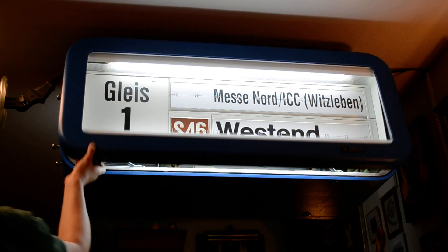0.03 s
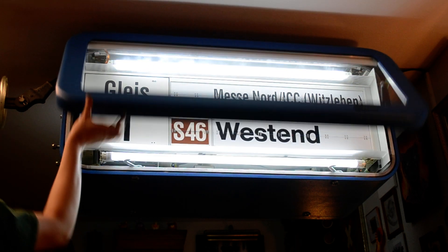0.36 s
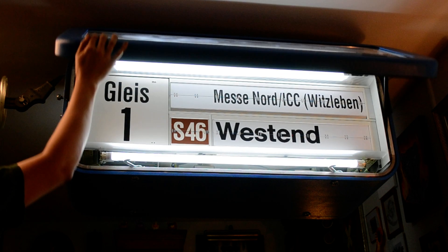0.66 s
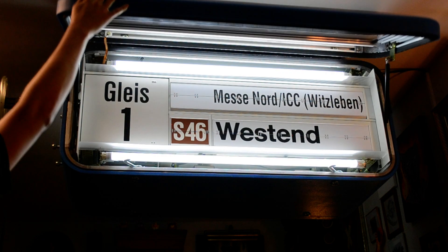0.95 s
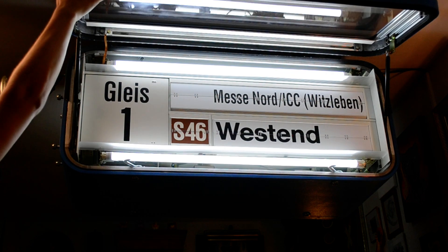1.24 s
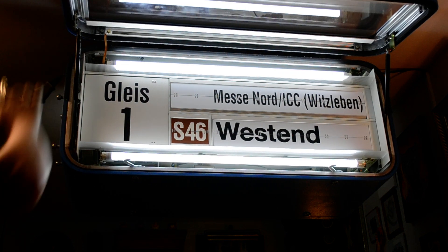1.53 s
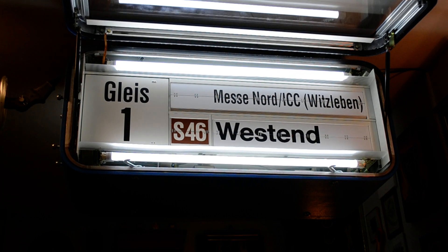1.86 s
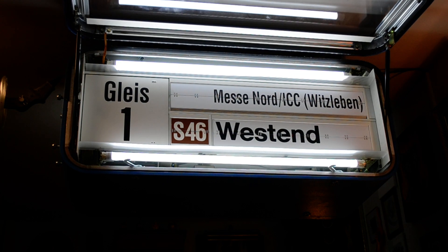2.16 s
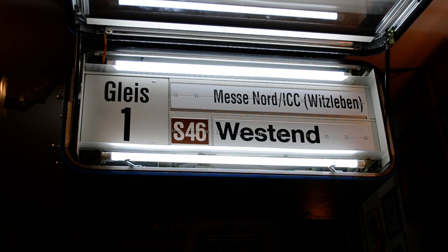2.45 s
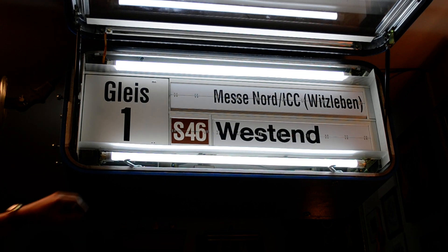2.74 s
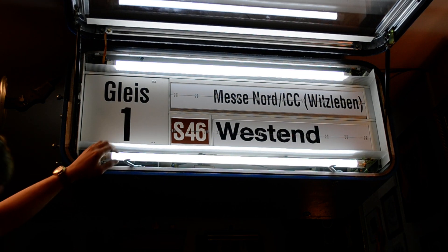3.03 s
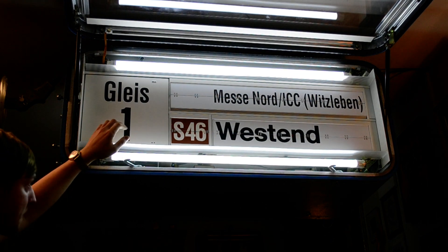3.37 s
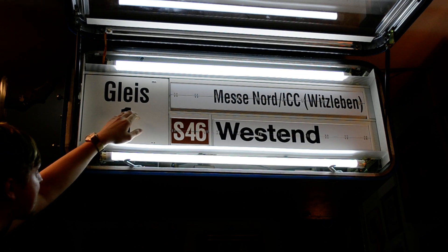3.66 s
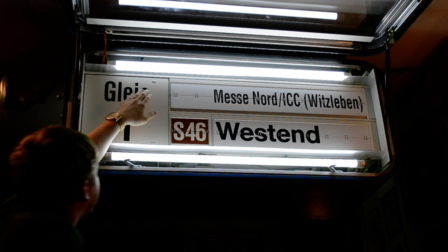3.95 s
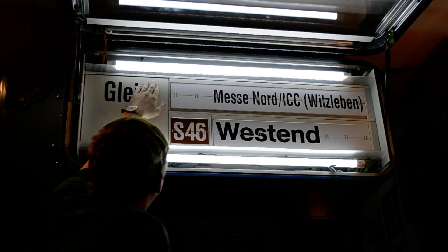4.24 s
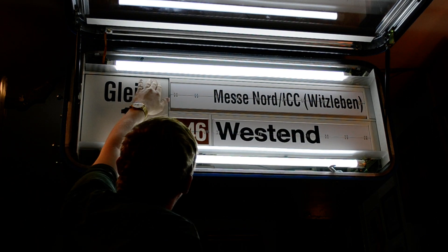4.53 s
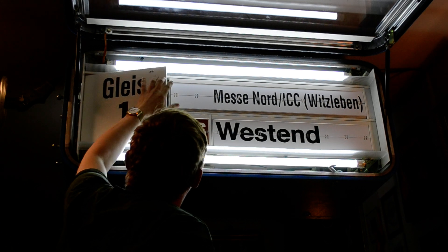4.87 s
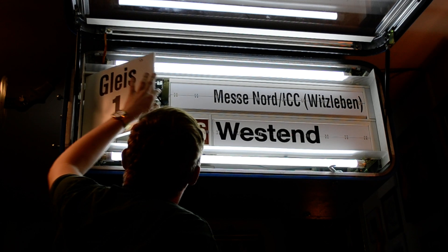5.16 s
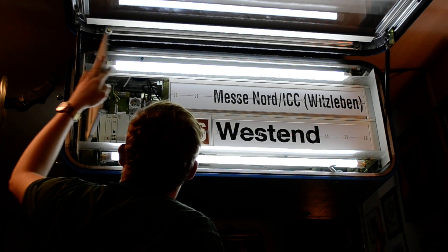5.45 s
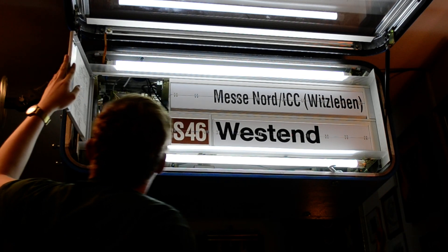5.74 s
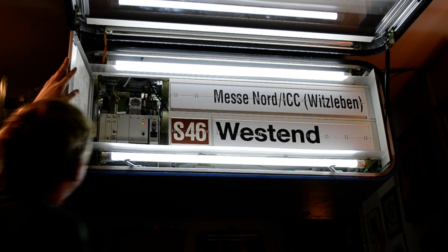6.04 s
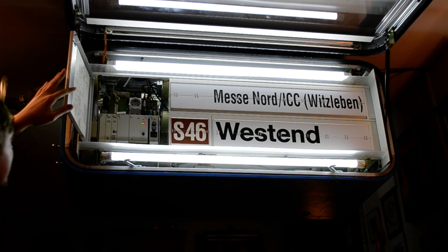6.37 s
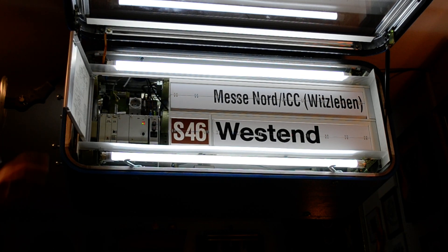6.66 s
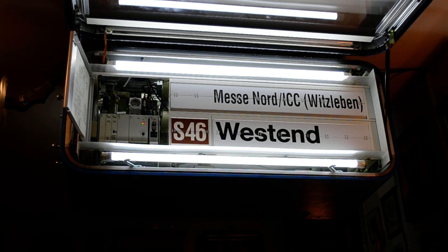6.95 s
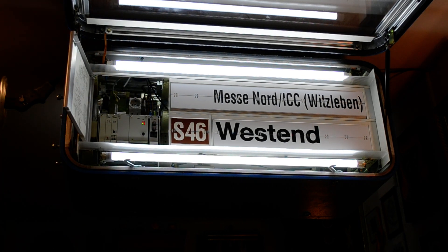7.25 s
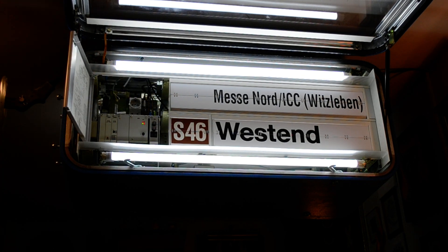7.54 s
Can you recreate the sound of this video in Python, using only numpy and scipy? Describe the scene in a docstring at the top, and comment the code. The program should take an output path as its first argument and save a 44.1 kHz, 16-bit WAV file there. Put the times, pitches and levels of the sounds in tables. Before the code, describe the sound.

A hinged cover lifts with a faint hiss and soft knock, then fingers squeak, a catch clacks and a panel knocks open.

```python
"""Opening a lit sign case

The glazed cover swings up on a hissing gas strut and knocks at its stop. A hand judders over the
inner panel in stick-slip squeaks and presses its catch, which clacks in and out; a spring frees the
panel and it swings open against the case. Each blow is a noise crack plus ringing modes.
All is heard from across a small, quiet, live room, over the hum of the lamps."""
import sys
import numpy as np
from scipy import signal
from scipy.fft import rfft, irfft, next_fast_len
from scipy.io import wavfile
from scipy.ndimage import uniform_filter1d, map_coordinates

SR = 44100
rng = np.random.default_rng(int(sys.argv[2]) if len(sys.argv) > 2 else 0)


def pcm_store(signal):
    """Save signal as 16-bit PCM."""
    levels = np.round(np.clip(np.atleast_2d(signal), -1, 1) * 32767)
    wavfile.write(sys.argv[1], SR, levels.astype(np.int16).T)


N = 339570
TIME = np.arange(N) / SR
RING_TIME = TIME[:SR // 2]

# the cover meets its stop: time_s, level_db, tilt_db_per_octave
COVER_HITS = [(1.159, -35, 1)]
# the spring kicks the panel: time_s, level_db, tilt_db_per_octave
SPRING_HITS = [(4.716, -41.5, -3), (4.726, -37, -0.5), (4.741, -30, 10), (4.746, -23.5, 0),
               (4.756, -27.5, 0)]
# the hand's short pushes, relative levels: time_s, drag_db, hiss_db, squeak_db
PUSHES = [(3.132, -49, -55, -42), (3.191, -38, -42, -53), (3.285, -35.5, -47, -29),
          (3.364, -38, -48, -27.5), (3.435, -38.5, -53, -30.5), (3.515, -44, -60.5, -46.5)]


def catch():
    """The catch is pressed home with a bright clack."""
    hits = [(4.498, -56.5, -6.5), (4.5535, -20.5, 1.2), (4.561, -25.5, -3)]  # blows: time_s, level_db, tilt_db_per_octave
    colour = [(41, -63), (70, -32.5), (171, -18.5), (252, -28.5), (508, -17), (656, 0), (730, -14.5),
              (904, -4), (1640, -2.5), (2310, -3), (2980, 0.5), (3390, -3), (8840, -1), (11400, -10),
              (14800, -54), (22000, -120)]  # crack spectrum: frequency_hz, relative_db
    modes = [(1367, -52), (1610, -58), (1981, -49), (2417, -65), (3063, -55), (3327, -59.5), (3720, -60),
             (3930, -58), (4027, -50), (4350, -43.5), (4468, -43), (4743, -53.5), (5028, -55),
             (5109, -66.5), (5787, -58), (5835, -53), (6514, -67), (6778, -63), (6955, -66), (7289, -44.5),
             (8344, -59), (8721, -60.5), (8958, -62), (9297, -67), (9507, -62), (9539, -58), (9658, -65),
             (9846, -49)]  # resonances: pitch_hz, relative_db
    return struck(hits, colour, modes, ring_db=-3, ring_t60=.23, early=.27, early_t60=.055, ripple_db=2.5)


def spring():
    """The catch's spring pushes the panel free in a quick rattle."""
    colour = [(41, -83), (70, -44), (154, -24), (252, -26.5), (286, -13.5), (519, -14.5), (603, -4),
              (730, -11.5), (1910, -4.5), (2620, -9.5), (2980, -6.5), (4100, -9), (9430, -5.5),
              (11400, -14.5), (14800, -71), (22000, -120)]  # crack spectrum: frequency_hz, relative_db
    modes = [(1222, -56), (1916, -53.5), (1970, -65), (2315, -54), (2972, -50), (3068, -64), (3424, -60),
             (3639, -66), (5060, -51), (5222, -65), (5539, -64), (5857, -72), (6584, -68.5), (6804, -57),
             (7537, -57), (8355, -59), (9087, -55), (9469, -54)]  # resonances: pitch_hz, relative_db
    return struck(SPRING_HITS, colour, modes,
                  ring_db=-8, ring_t60=.44, early=.46, early_t60=.11, ripple_db=4)


def panel_stop():
    """The panel knocks against the case and rings."""
    hits = [(5.7575, -24.5, 2.1), (5.770, -29, -3)]  # blows: time_s, level_db, tilt_db_per_octave
    colour = [(41, -75), (70, -62.5), (144, -21.5), (318, -15), (411, -13.5), (542, -8), (590, -22),
              (700, -7.5), (1030, -14.5), (2360, -2), (4100, -7), (6420, -7), (8120, -15.5), (9430, -12),
              (11400, -29), (14800, -68.5), (22000, -120)]  # crack spectrum: frequency_hz, relative_db
    modes = [(409.1, -53.5), (425.3, -57), (538.3, -60), (662.1, -55.5), (699.8, -58), (855.9, -46),
             (1136, -52), (1384, -54), (1674, -45.5), (1733, -62), (1949, -44.5), (2331, -53.5),
             (2433, -43), (2606, -57), (3133, -46), (3235, -49), (3601, -61), (3661, -57), (3795, -50),
             (3914, -52), (4011, -61), (4317, -57), (4366, -51), (4613, -46.5), (4770, -59), (4904, -63),
             (5141, -63), (5572, -49), (5862, -49), (6428, -56)]  # resonances: pitch_hz, relative_db
    return struck(hits, colour, modes, ring_db=-2, ring_t60=.35, early=.23, early_t60=.042, ripple_db=3)


def panel_ring():
    """Once the catch lets go, the panel's least damped modes sing on."""
    modes = [(300, -59, .8), (345, -59, .7), (660, -59, .6), (1225, -57, .65), (3066, -45, .6)]  # lingering resonances: pitch_hz, relative_db, t60_s
    out = np.zeros(N)
    freed_s = max(SPRING_HITS, key=lambda hit: hit[1])[0]
    for hz, db, t60 in modes:
        fade = amp(db - 60 * RING_TIME / t60) * (1 - np.exp(-RING_TIME / .02))
        tone = np.sin(2 * np.pi * hz * RING_TIME + .5 * wobble(33, len(RING_TIME)))
        add(out, freed_s, 2 * fade * tone)
    return out


def cover_stop():
    """The glazed cover knocks at the top of its swing."""
    colour = [(59, -53), (100, -14), (215, -8), (252, -23), (325, -14), (373, -6.5), (553, -2.5),
              (729, -8.5), (1290, -0.5), (1390, -7), (1570, 1), (3060, -2.5), (5860, -18), (9590, -23),
              (11000, -38), (14300, -68), (22000, -120)]  # crack spectrum: frequency_hz, relative_db
    modes = [(328.4, -64.5), (570.6, -74), (689.1, -72), (855.9, -73), (1071, -66), (1319, -61),
             (1604, -63), (1776, -59), (1852, -66), (1981, -59), (2202, -67), (2239, -59), (2444, -71),
             (2552, -73), (3079, -65), (3386, -66), (3763, -76), (4016, -86)]  # resonances: pitch_hz, relative_db
    return struck(COVER_HITS, colour, modes,
                  ring_db=-2, ring_t60=.37, early=.53, early_t60=.022, ripple_db=2.5)


def gas_strut(start_s=.345, build_s=.22, flow_db=-57, flutter_db=2):
    """Gas hisses between two chambers: the growing one's tones fall, the shrinking one's rise."""
    colour = [(40, -40), (200, -19), (1000, 1.5), (1800, -6.5), (2700, -6.5), (4500, -1.5), (6000, 1),
              (8000, 3), (10000, 2), (11500, -9.5)]  # hiss spectrum: frequency_hz, relative_db
    hz, t, hiss = signal.stft(noise(colour), SR, nperseg=1024)
    travel_s = np.clip(t - start_s, 0, COVER_HITS[0][0] - start_s)
    # sound's round trip in each chamber, as the piston slows evenly
    rest_ms, cylinder_ms, speed_ms_per_s, braking_ms_per_s2 = .18, 1.06, .895, .34
    growing_ms = rest_ms + speed_ms_per_s * travel_s - braking_ms_per_s2 * travel_s ** 2 / 2
    shrinking_ms = cylinder_ms - growing_ms
    hz = hz[:, None]
    echo = along([(1500, .87), (4000, .76), (10000, .67)], hz)  # the ends reflect treble less well
    pipe = lambda ms: (1 - echo ** 2) / np.abs(1 - echo * np.exp(2j * np.pi * hz * ms / 1000)) ** 2
    share = along([(3000, .1), (4300, .9), (5400, .15), (10000, .2)], hz)
    power = .15 + pipe(growing_ms) + share * pipe(shrinking_ms)
    build = np.clip(travel_s / build_s, 0, 1)
    gain = np.sqrt(1 - build + build * power / power.mean(0))
    # turbulence breaks the tones into patches
    patches = uniform_filter1d(rng.standard_normal(hiss.shape), size=24, axis=0)
    patches = uniform_filter1d(patches, size=6, axis=1)
    gain *= amp(flutter_db * build * unit(patches))
    flow = amp(flow_db) * swell(.22, attack_s=.068, hold_s=.85, fall_db_per_s=56)
    return flow * signal.istft(hiss * gain, SR, nperseg=1024)[1][:N]


def hand_rub(attack_s=.023, hold_s=.014, drag_trim_db=-1.5, wet_db=-12):
    """Each push drags skin over the panel, which rumbles, hisses and squeaks into the room."""
    drag_colour = [(59, -74), (100, -41), (173, -16.5), (249, -15.5), (360, -3.5), (407, -16.5), (473, -6),
                   (520, -16), (665, -7), (886, -4), (1060, -1.5), (1550, -13), (2180, -44), (2600, -37),
                   (3380, -57), (5720, -120)]  # panel rumble: frequency_hz, relative_db
    skin_colour = [(1060, -37), (1800, -1.5), (2950, -8.5), (4410, -6.5), (7820, -16), (8990, -13.5),
                   (10100, -19), (11400, -22), (14800, -63), (22000, -120)]  # skin hiss: frequency_hz, relative_db
    drags = [amp(db) * swell(s, attack_s, hold_s, fall_db_per_s=155) for s, db, _, _ in PUSHES]
    hisses = [amp(db) * swell(s, attack_s, hold_s, fall_db_per_s=152) for s, _, db, _ in PUSHES]
    grip_db = wobble(110, N)
    rumble = np.linalg.norm(drags, axis=0) * amp(drag_trim_db + grip_db) * noise(drag_colour)
    hiss = np.linalg.norm(hisses, axis=0) * amp(grip_db / 2) * noise(skin_colour)
    squeaks = finger_slips()
    tail = room_tail()
    echoes = signal.fftconvolve(squeaks, tail / np.linalg.norm(tail))[:N]
    return rumble + hiss + squeaks + amp(wet_db) * echoes


def finger_slips(pitch_hz=1065, sag=.043, scatter=.016, gap_s=.019, half_length_s=.0105, loss_db=2.2):
    """At every push the fingers stick and slip: three ever weaker squeaks that sag in pitch."""
    out = np.zeros(N)
    from_peak = np.arange(-2 * half_length_s, 2 * half_length_s, 1 / SR) / half_length_s
    for s, _, _, db in PUSHES:
        for k in range(3):
            hz = pitch_hz * (1 + scatter * rng.standard_normal() - sag * np.tanh(from_peak))
            squeak = np.exp(-3 * from_peak ** 2) * np.sin(2 * np.pi * np.cumsum(hz) / SR)
            add(out, s + k * gap_s - 2 * half_length_s, amp(db - loss_db * k) * squeak)
    return out


def double_knock():
    """A soft double knock sounds away from the case."""
    hits = [(2.256, -46, -4), (2.266, -44.5, -0.5), (2.316, -45, 0.5)]  # blows: time_s, level_db, tilt_db_per_octave
    colour = [(59, -56), (100, -27), (215, -9.5), (296, -17), (373, -4), (1040, -13), (1520, -9),
              (1750, -9), (1910, -3.5), (2130, -10), (3150, -13), (7000, -41), (9100, -75), (15400, -120)]  # crack spectrum: frequency_hz, relative_db
    modes = [(1200, -73), (1486, -66), (1545, -68), (1825, -67), (1906, -70), (2514, -64), (2762, -77),
             (3052, -67), (3354, -75)]  # resonances: pitch_hz, relative_db
    return struck(hits, colour, modes, ring_db=-7, ring_t60=.4, early=.8, early_t60=.046, ripple_db=3)


def ticks_and_bumps():
    """The strut ticks as it starts moving; light bumps and ticks follow, each in one broad band."""
    ticks = [(.401, -47.5, 5000, 0.67), (.64, -66, 179, 0.65), (1.345, -68, 121, 0.66),
             (3.122, -48.5, 500, 0.74), (3.168, -53, 356, 0.69), (3.895, -58, 700, 1.5),
             (5.487, -52.5, 890, 1.2), (5.52, -51, 493, 0.63), (6.84, -60, 714, 0.44),
             (7.128, -52.5, 4000, 1.6), (7.163, -51.5, 696, 2), (7.17, -66, 110, .4)]  # ticks and bumps: time_s, level_db, centre_hz, width_octaves
    out = np.zeros(N)
    for s, db, centre_hz, octaves in ticks:
        colour_db = lambda f: -12 * np.log1p((np.log2((f + 1) / centre_hz) / octaves) ** 2)
        hardness = centre_hz / 1000  # a brighter tick is shorter and more abrupt
        add(out, s, amp(db) * crack(colour_db, early=hardness, early_t60=.084 / np.sqrt(hardness)))
    return out


def soft_hisses(flutter_db=1.8, fall_db_per_rise=2.5):
    """Soft swells of hiss: the strut's opening surge, the spring's fading tail, and cloth brushing."""
    swells = [(.25, -60.5, .035), (1.95, -66.5, 0.087), (2.592, -55.5, 0.016), (4.0, -58.5, 0.043),
              (5.0, -65.5, 0.039), (5.43, -67.5, 0.027), (6.43, -68, 0.031), (6.98, -68, 0.051),
              (7.36, -64, 0.066)]  # swells of hiss: peak_s, level_db, rise_s
    colour = [(40, -48.5), (300, -3.5), (1500, -0.5), (5500, 0), (10000, -5), (11500, -13)]  # hiss spectrum: frequency_hz, relative_db
    level = sum(amp(db) * swell(s, rise_s, 0, fall_db_per_rise / rise_s) for s, db, rise_s in swells)
    return level * amp(-flutter_db * wobble(35, N)) * noise(colour)


def room_tone(waver_db=.5, whine_db=-70.5, whine_hz=7550, lower_hz=3550, whine_width_s=.053):
    """Softly drifting room noise, the lamps' hum and a thin whine that comes and goes."""
    colour = [(15, -49), (25, -17.5), (167, -6.5), (194, -5), (271, -4.5), (293, -3.5), (324, -2.5),
              (441, -2.5), (927, -3), (1050, -4.5), (1360, -3.5), (3340, -9), (7780, -21.5), (9540, -20.5),
              (11400, -27.5), (14800, -61), (22000, -120)]  # room noise spectrum: frequency_hz, relative_db
    drift = [(0, -61.5), (1.5, -63), (2.9, -64.5), (4.2, -62), (7.7, -62.5)]  # room noise drift: time_s, level_db
    partials = [(200, -84.5), (300, -80.5), (450, -84), (631, -85), (733, -86.5), (1331, -82), (3610, -84),
                (3876, -87.5)]  # lamp hum and buzz: pitch_hz, level_db
    whine_times = [.05, 2.04, 5.05, 6.04, 7.04]  # whine swells: peak_s
    air = amp(np.interp(TIME, *np.transpose(drift)) + waver_db * wobble(6, N)) * noise(colour)
    hum = sum(amp(db) * np.sqrt(2) * np.sin(2 * np.pi * hz * TIME + hz / 1500 * wobble(12, N))
              for hz, db in partials)
    swells = sum(np.exp(-((TIME - s) / whine_width_s) ** 2) for s in whine_times)
    fuzzy = lambda hz: np.sin(2 * np.pi * hz * TIME + wobble(200, N))
    whine = amp(whine_db) * swells * (fuzzy(whine_hz) + amp(-2) * fuzzy(lower_hz))
    return air + hum + whine


def struck(hits, colour, modes, ring_db, ring_t60, early, early_t60, ripple_db):
    """Every blow gives a crack and rings the object's modes at new strengths."""
    out = np.zeros(N)
    hz, mode_db = np.transpose(modes)[:, :, None]
    decay = amp(-60 * RING_TIME / (ring_t60 * (hz / 2000) ** -.12))  # high modes fade sooner
    # crowded weak modes roughen the spectrum
    grid_hz = np.arange(0, SR / 2, 55)
    ripple = ripple_db * rng.standard_normal(len(grid_hz)) * np.minimum(grid_hz / 1500, 1)
    for s, db, tilt_db in hits:
        gain = amp(mode_db + tilt_db * np.log2(hz / 1000) + rng.normal(0, 1, hz.shape))
        # echoes blur the phase
        blur = np.array([rng.uniform(0, 2 * np.pi) + .5 * wobble(45, len(RING_TIME)) for _ in hz])
        ring = (gain * np.sin(2 * np.pi * hz * RING_TIME + blur) * decay).sum(0)
        ring *= (1 - np.exp(-RING_TIME / .0029)) / np.linalg.norm(gain)
        colour_db = lambda f: (along(colour, f) + np.interp(f, grid_hz, ripple)
                               + tilt_db * np.log2(np.maximum(f, 200) / 1000))
        add(out, s, amp(db) * (crack(colour_db, early, early_t60) + amp(ring_db) * ring))
    return out


def crack(colour_db, early, early_t60):
    """A blow's dense vibration: a strong first burst that runs into the room's echoes."""
    attack = 1 - np.exp(-RING_TIME / .0011)
    burst = (1 + early * amp(-60 * RING_TIME / early_t60)) / (1 + early)
    return coloured(attack * burst * room_tail(), colour_db)


def room_tail():
    """Dense echoes: noise in which each frequency fades at the room's own pace."""
    reverb = [(100, 0.48), (400, 0.5), (2200, 0.45), (5000, .39), (10000, 0.29)]  # room decay: frequency_hz, t60_s
    hz, t, bands = signal.stft(rng.standard_normal(len(RING_TIME)), SR, nperseg=256)
    decay = amp(-60 * t / along(reverb, hz)[:, None])
    return signal.istft(bands * decay, SR, nperseg=256)[1][:len(RING_TIME)]


def coloured(x, colour_db):
    """x through a minimum-phase filter of unit energy, given in dB as a function of frequency."""
    size = 2 * next_fast_len(len(x) // 2 + 4096)
    cepstrum = irfft(np.log(amp(colour_db(np.fft.rfftfreq(size, 1 / SR)))))
    cepstrum[1:size // 2] *= 2
    cepstrum[size // 2 + 1:] = 0
    response = np.exp(rfft(cepstrum))
    return irfft(rfft(x, size) * response / np.sqrt(np.mean(np.abs(response) ** 2)))[:len(x)]


def noise(colour):
    """Noise of rms 1, shaped by (Hz, dB) points."""
    return unit(coloured(rng.standard_normal(N), lambda f: along(colour, f)))


def swell(s, attack_s, hold_s, fall_db_per_s):
    """A gain that rises to 1 at time s, holds, then falls evenly in dB."""
    rise = np.exp(-(np.minimum(TIME - s, 0) / attack_s) ** 2)
    return rise * amp(-fall_db_per_s * np.maximum(TIME - s - hold_s, 0))


def wobble(rate, size):
    """A smooth random curve with rate knots a second."""
    return map_coordinates(rng.standard_normal(int(size * rate / SR) + 4), [np.arange(size) * rate / SR])


def along(points, hz):
    """(Hz, value) points read on a log axis."""
    f, v = np.transpose(points)
    return np.interp(np.log(hz + 1), np.log(f + 1), v)


def amp(db):
    """Decibels to gain."""
    return 10 ** (np.asarray(db) / 20)


def unit(x):
    """x at rms 1."""
    return x / np.sqrt(np.mean(x ** 2) + 1e-20)


def add(track, s, sound):
    """Mix a sound into the track from time s."""
    part = track[max(0, round(s * SR)):][:len(sound)]
    part += sound[:len(part)]


def scene():
    """Cover, catch and panel sound in turn over the quiet room, in mono."""
    blows = cover_stop() + double_knock() + catch() + spring() + panel_stop() + panel_ring()
    return (blows + gas_strut() + ticks_and_bumps() + hand_rub() + soft_hisses() + room_tone())[None]


def record(dry, notch_hz=7950, notch_db=-7, low_cut_hz=35, top_hz=11574):
    """The microphone cuts deep bass, has a narrow notch and rolls off into a steep treble cut."""
    size = next_fast_len(N + SR)
    hz = np.fft.rfftfreq(size, 1 / SR)
    rolloff_db = along([(10300, -.5), (11000, -9.5), (11500, -13.5)], hz)
    dip_db = notch_db / (1 + ((hz - notch_hz) / 150) ** 2)
    low_cut = 1j * hz / (low_cut_hz + 1j * hz)
    high_cut = 1 / np.sqrt(1 + (hz / top_hz) ** 120)
    return irfft(rfft(dry, size) * amp(rolloff_db + dip_db) * low_cut * high_cut, size)[:, :N]


dry = scene()
out = record(dry)
pcm_store(out)
```